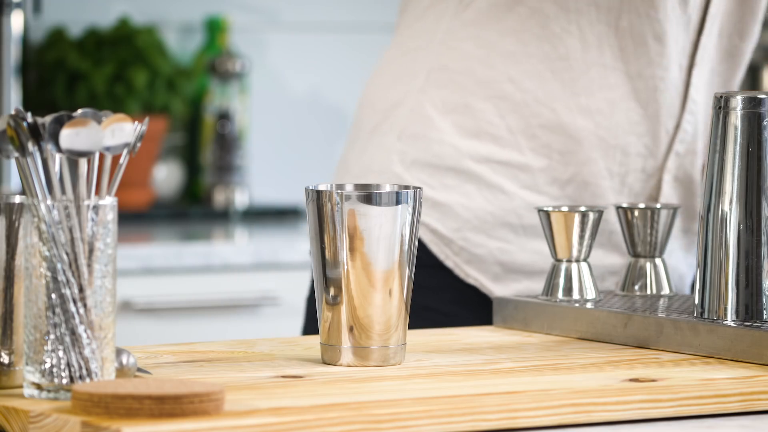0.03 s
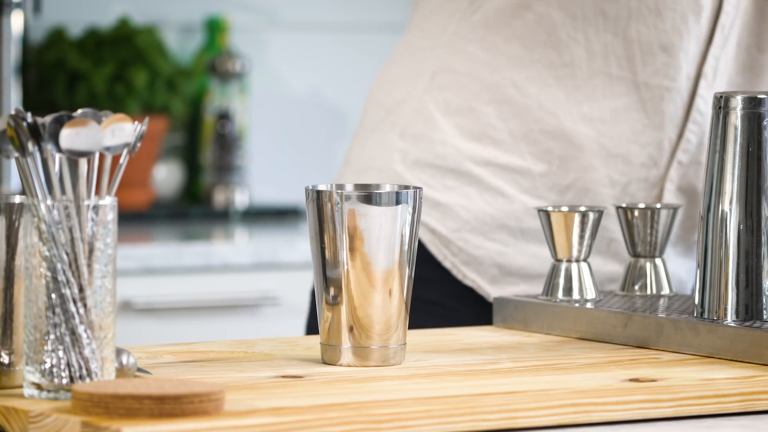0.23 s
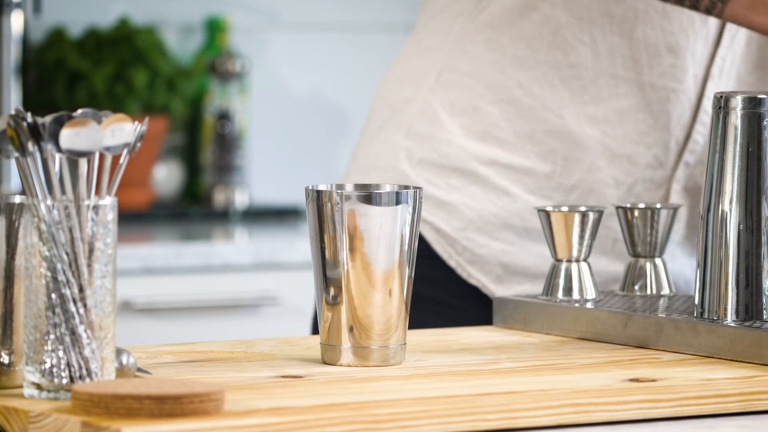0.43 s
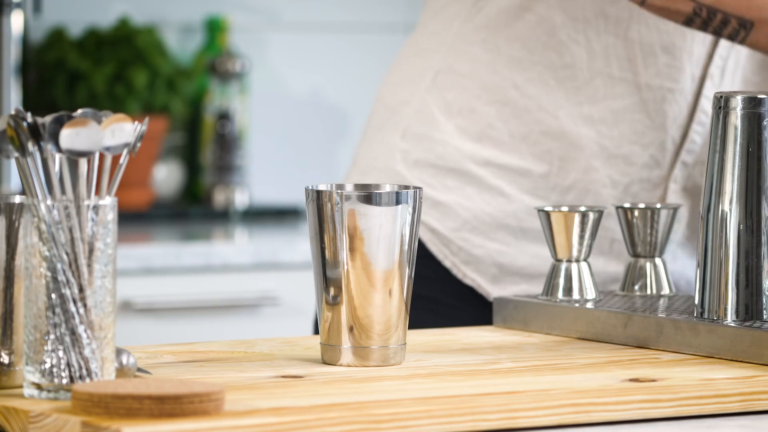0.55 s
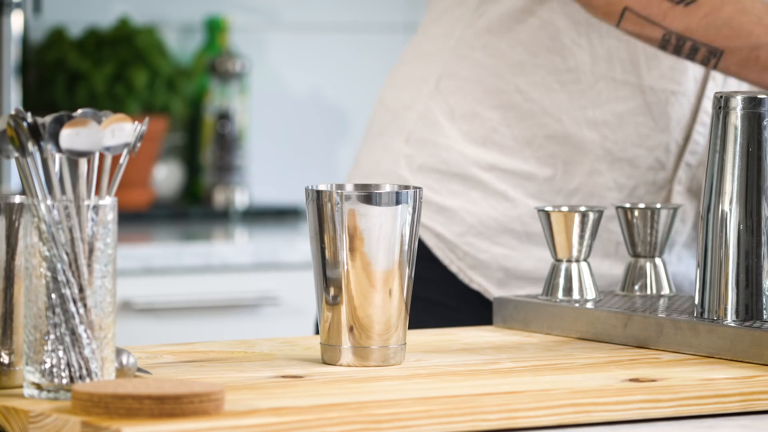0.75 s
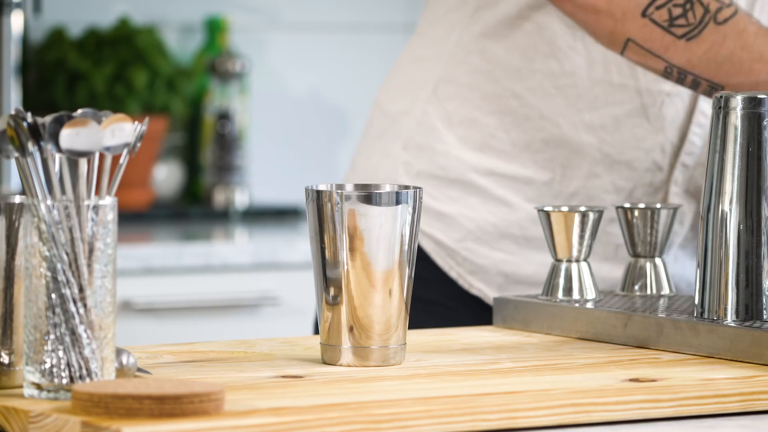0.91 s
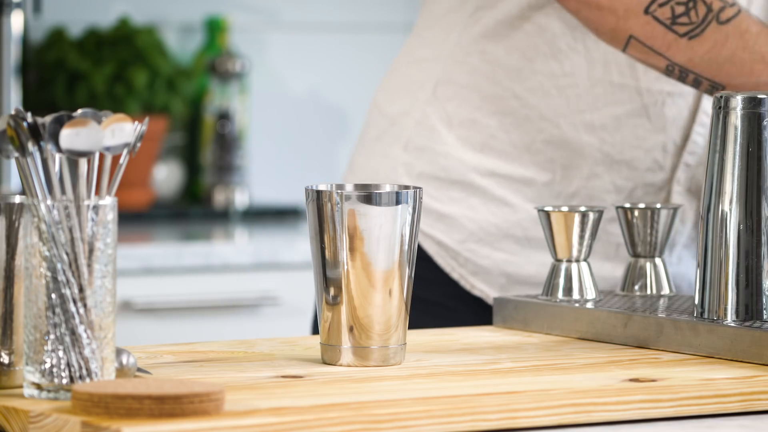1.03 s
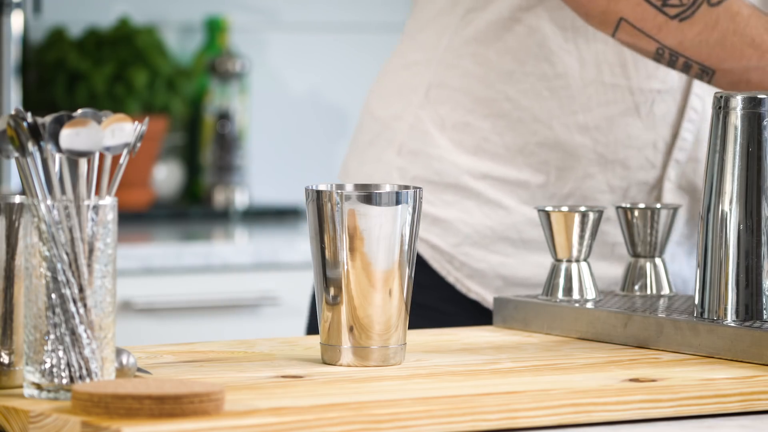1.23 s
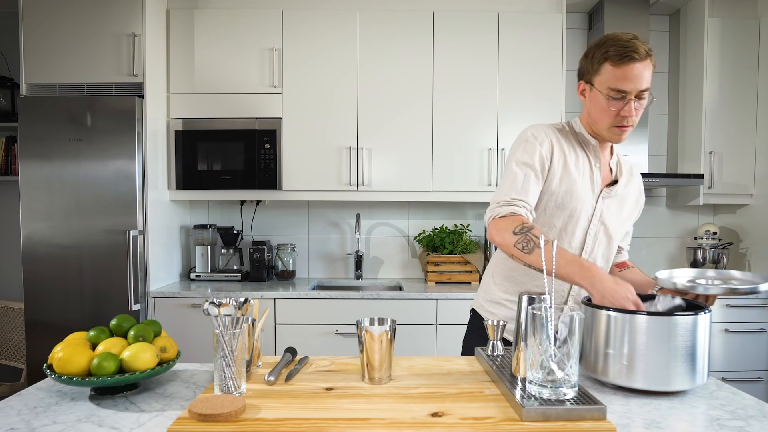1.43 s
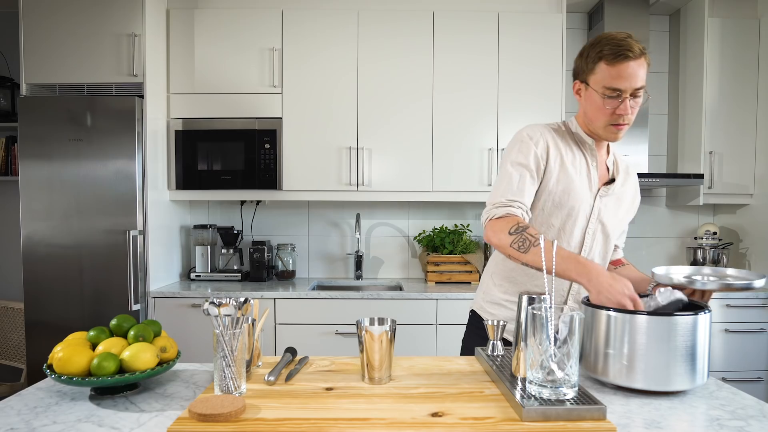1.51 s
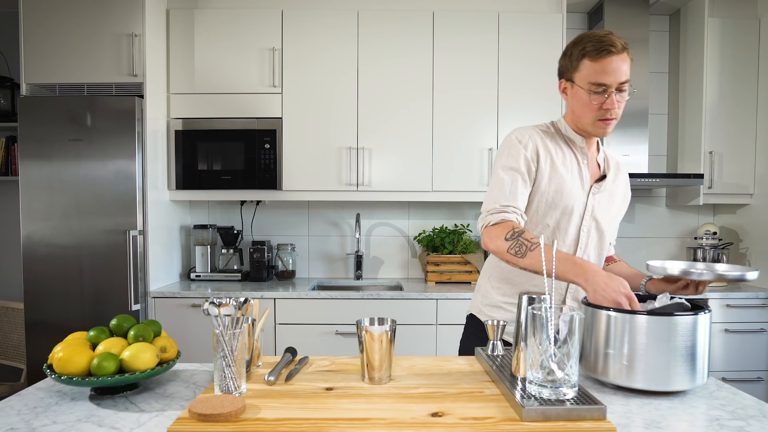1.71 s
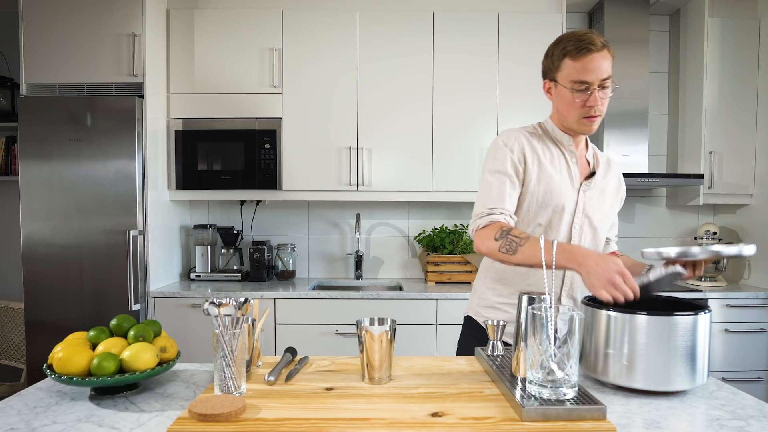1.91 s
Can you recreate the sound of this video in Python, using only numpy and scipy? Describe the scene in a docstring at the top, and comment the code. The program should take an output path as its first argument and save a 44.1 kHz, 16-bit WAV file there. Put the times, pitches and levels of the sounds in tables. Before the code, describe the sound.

Ice cubes rattle in a bucket as a metal scoop clinks once going in, then digs through them in irregular bursts. After a brief lull, cubes clatter into place in the scoop, close to the microphone in a kitchen.

```python
"""A metal scoop digs through a bucket of ice cubes in a kitchen, close to a single microphone.
Cubes knock, crack and thud on the bucket wall over a churn of small contacts. The empty scoop clinks
once on the way in; lifted out, its load settles with a last bright clatter. Each knock is a burst of
micro-contacts that sets ice, bucket or scoop ringing. Behind them are a short room tail and faint air."""
import sys
import numpy as np
from scipy import signal
from scipy.fft import rfft, irfft
from scipy.io import wavfile

SR = 44100
rng = np.random.default_rng(int(sys.argv[2]) if len(sys.argv) > 2 else 0)


def waveform_to_disk(signal):
    """Save audio, clipped to [-1, 1], as 16-bit WAV at the path in sys.argv[1]."""
    frames = np.transpose(np.atleast_2d(signal))
    scaled = np.clip(frames, -1, 1) * 32767
    samples = np.round(scaled).astype(np.int16)
    wavfile.write(sys.argv[1], SR, samples)


N = 85995
RING_T = np.arange(SR // 3) / SR  # time axis of one blow, in seconds


def undb(db):
    """Decibels to gain."""
    return 10 ** (np.asarray(db) / 20)


def unit(x):
    """Scale to unit energy."""
    return x / np.sqrt(np.sum(x ** 2) + 1e-18)


def fade(t, t60):
    """Exponential decay, 60 dB down after t60 seconds."""
    return np.exp(-np.log(1000) * t / t60)


def through(x, response):
    """Pass a sound through an impulse response."""
    return signal.fftconvolve(x, response)[:len(x)]


def add(out, start_s, blow, level_db, window_s=0.01):
    """Mix in a blow with the energy of level_db held for window_s."""
    i = max(int(start_s * SR), 0)
    out[i:i + len(blow)] += (unit(blow) * undb(level_db) * np.sqrt(window_s * SR))[:N - i]


def click(colour, size=2048):
    """A sharp click with the given spectrum."""
    hz, db = np.array(colour).T
    bins_hz = np.maximum(np.fft.rfftfreq(size, 1 / SR), 1)
    gain = undb(np.interp(np.log(bins_hz), np.log(hz), db))
    cepstrum = irfft(np.log(gain))
    cepstrum[1:size // 2] *= 2  # minimum phase: the energy comes at the front
    cepstrum[size // 2 + 1:] = 0
    pulse = irfft(np.exp(rfft(cepstrum)))
    return unit(np.pad(pulse, (0, len(RING_T) - size)))


def ring(modes):
    """Decaying modes; neighbours swing in opposite directions."""
    return unit(sum((-1) ** k * undb(db) * np.cos(2 * np.pi * hz * RING_T) * fade(RING_T, t60)
                    for k, (hz, db, t60) in enumerate(modes)))


def soft(x, edge_hz):
    """A soft contact leaves out the treble."""
    return unit(signal.sosfilt(signal.butter(2, edge_hz, fs=SR, output="sos"), x))


def struck(colour, modes, ring_db, edge_hz, lag_s=0.0008):
    """A contact click and, just after it, the modes that it sets ringing."""
    lag = int(lag_s * SR)
    ringing = soft(ring(modes), edge_hz)
    return click(colour) + undb(ring_db) * np.pad(ringing, (lag, 0))[:-lag]


def chatter(contact_s, spread_db=4.5):
    """The force of one contact: a first touch, then rough micro-contacts that die away."""
    n = len(RING_T)
    rough = rng.standard_normal(n) * undb(spread_db * np.minimum(rng.exponential(size=n), 5))
    force = unit(rough * np.exp(-(RING_T / contact_s) ** 2))
    force[0] += 0.44  # the first touch
    return force


# Click spectra of bucket wall, bucket hollow, heap of cubes and cracking ice: frequency_hz, level_db
WALL_CLICK = [(40, -59), (100, -29), (180, -8.5), (280, -2.5), (430, 6.5), (520, 3), (700, -9),
              (1200, -27.5), (4000, -71.5)]
HOLLOW_CLICK = [(200, -22.5), (500, -5.5), (750, -8), (1300, 1.5), (1800, -9), (5000, -17)]
HEAP_CLICK = [(200, -74.5), (1000, -18.5), (1600, 6.5), (2300, 5), (3000, -1.5), (3600, -2), (4700, -3),
              (6000, -18), (14000, -64)]
CRACK_CLICK = [(1000, -36), (3400, -9.5), (5200, 3.5), (6800, 2.5), (8000, -4), (11000, -8), (15000, -11.5),
               (16500, -33)]
# Modes of the wall, the hollow and the heap: pitch_hz, level_db, t60_s
WALL_MODES = [(227, -12.5, 0.1), (319.3, -9.5, 0.098), (450, -7, 0.021), (486.5, 7, 0.034),
              (530, -4.5, 0.016)]
HOLLOW_MODES = [(599, -4.5, 0.058), (850, -23, 0.082), (840, 0.5, 0.029), (954, 1.5, 0.09),
                (1105, -6.5, 0.15), (1278, -4, 0.017)]
HEAP_MODES = [(1513, -4.5, 0.075), (1720, 3.5, 0.038), (2080, -5, 0.015), (2197, 8.5, 0.11),
              (2565, 13, 0.0083), (3025, -12.5, 0.06), (3490, -5, 0.02), (3811, 0.5, 0.061),
              (4306, 0.5, 0.022), (4698, -4.5, 0.043)]


def ice_bucket():
    """The four voices a contact excites: bucket wall, its hollow, heap of cubes, cracking surface."""
    wall = struck(WALL_CLICK, WALL_MODES, ring_db=-0.08, edge_hz=500)
    hollow = struck(HOLLOW_CLICK, HOLLOW_MODES, ring_db=-5.5, edge_hz=1600)
    heap = struck(HEAP_CLICK, HEAP_MODES, ring_db=-6.25, edge_hz=5500)
    return [wall, hollow, heap, click(CRACK_CLICK)]


# Single knocks in the bucket: start_s, contact_s, pitch_hz, wall_db, hollow_db, heap_db, crack_db
CUBE_KNOCKS = [(0.001, 0.01, 2250, -45, -36, -40.5, -40), (0.055, 0.0015, 3600, -71, -56, -39, -47),
               (0.0638, 0.0024, 1440, -42.5, -40, -41, -38.5),
               (0.0972, 0.0041, 1510, -39.5, -32.5, -46, -73), (0.1254, 0.004, 1740, -31, -59, -32, -43.5),
               (0.172, 0.0085, 2190, -30, -36, -36, -59), (0.228, 0.009, 3980, -42, -32.5, -23, -33.5),
               (0.3025, 0.0053, 2270, -17.5, -27, -20, -31), (0.313, 0.0027, 2310, -43, -56, -15, -30),
               (0.319, 0.0035, 1750, -30, -27.5, -23, -35), (0.332, 0.0013, 1910, -25, -30, -23.5, -31.5),
               (0.346, 0.0033, 2250, -26.5, -40, -36, -53), (0.471, 0.007, 2130, -34, -33, -27, -41),
               (0.482, 0.0032, 2730, -39, -27, -22, -27.5), (0.49, 0.0081, 2260, -32, -30, -23, -23.5),
               (0.502, 0.0058, 1570, -15, -23, -17, -35), (0.534, 0.0036, 2300, -30, -26, -25, -39),
               (0.5468, 0.0044, 4000, -46, -22, -18.5, -26.5), (0.551, 0.0016, 2250, -16, -27, -49, -25.5),
               (0.57, 0.0033, 2550, -20, -42, -29.5, -40), (0.614, 0.0096, 2160, -23, -44, -21, -28),
               (0.6233, 0.0029, 2300, -30, -38, -20.5, -28), (0.632, 0.0073, 2590, -27, -40, -17, -42),
               (0.659, 0.0072, 2120, -26, -22.5, -23, -53), (0.702, 0.0043, 1900, -29, -37, -24.5, -40),
               (0.743, 0.0019, 2220, -50, -34, -24.5, -48), (0.788, 0.0058, 2200, -35, -27.5, -27, -33),
               (0.803, 0.0054, 1780, -37, -42, -20.5, -39.5), (0.853, 0.0036, 1780, -26.5, -54, -24.5, -32),
               (0.864, 0.0044, 1730, -22, -51, -18.5, -23.5), (0.877, 0.0088, 2270, -23.5, -18, -17.5, -22),
               (0.883, 0.013, 2640, -41, -49, -14, -19.5), (0.895, 0.015, 2660, -31, -44, -24, -28),
               (0.9185, 0.0078, 2400, -27.5, -20, -18, -26), (0.964, 0.011, 2260, -39, -29.5, -23.5, -54),
               (0.982, 0.0084, 2100, -55, -41, -18, -46), (1.007, 0.0037, 2430, -47, -59, -22.5, -46),
               (1.02, 0.0039, 2200, -55, -41, -21.5, -32.5), (1.048, 0.01, 2360, -26, -15.5, -17.5, -28),
               (1.0518, 0.0086, 1830, -20.5, -20.5, -15.5, -32),
               (1.089, 0.0014, 2320, -39, -44, -23.5, -40), (1.093, 0.0041, 2270, -54, -41, -19.5, -37),
               (1.16, 0.0033, 2600, -42, -43, -26, -30.5), (1.189, 0.009, 2120, -60, -23.5, -19.5, -37),
               (1.243, 0.011, 2710, -27, -19.5, -14.5, -37), (1.26, 0.0033, 2170, -33.5, -28, -18.5, -37),
               (1.283, 0.0048, 2190, -27, -24, -15.5, -24), (1.3415, 0.006, 2200, -64, -52, -19.5, -31.5),
               (1.3448, 0.0031, 2180, -38, -44, -19, -27), (1.395, 0.0051, 2240, -38.5, -33, -16.5, -20.5),
               (1.397, 0.0059, 2260, -38, -24, -12, -19.5), (1.413, 0.0049, 2450, -41, -30.5, -33, -54),
               (1.432, 0.0027, 2320, -48, -34, -15.5, -29.5),
               (1.488, 0.00076, 1940, -48.5, -61, -18.5, -42),
               (1.538, 0.0087, 1540, -38.5, -31.5, -34.5, -57.5)]


def cube_knocks(voices, note_t60_s=0.008, note_db=-3):
    """Close up, single cubes strike each other and the wall, each with its own short note."""
    out = np.zeros(N)
    wall, hollow, heap, crack = voices
    for start_s, contact_s, pitch_hz, wall_db, hollow_db, heap_db, crack_db in CUBE_KNOCKS:
        force = chatter(contact_s)
        note = soft(ring([(pitch_hz, 0, note_t60_s)]), edge_hz=4500)
        thud = wall + 0.51 * through(force, wall)  # the heavy wall takes a contact mostly as one push
        knock = unit(through(force, heap)) + undb(note_db) * unit(through(force, note))
        add(out, start_s + contact_s / 2, thud, wall_db)
        add(out, start_s, through(force, hollow), hollow_db)
        add(out, start_s, knock, heap_db)
        add(out, start_s, through(force, crack), crack_db)
    return out


# Spectrum of the bucket rumbling on the counter: frequency_hz, level_db
RUMBLE_CLICK = [(35, -33.5), (65, -19), (95, -6), (140, -5), (200, -9.5), (500, -39.5)]
# Course of the churn, before the trims: time_s, rumble_db, wall_db, hollow_db, heap_db, crack_db
CHURN_LEVELS = [(0, -52, -48, -43, -42, -46), (0.04, -51, -51, -50, -46, -49),
                (0.08, -44, -43, -46, -44, -50), (0.115, -51, -46, -45, -40, -54),
                (0.19, -50, -37, -42, -37, -45), (0.29, -62, -52, -52, -52, -58),
                (0.32, -44, -35, -40, -35, -43), (0.42, -54, -37, -42, -34, -44),
                (0.49, -47, -31, -32, -22, -29), (0.58, -42, -27, -35, -27, -35),
                (0.635, -47, -27, -31, -21, -31), (0.71, -49, -32, -36, -28, -39),
                (0.84, -49, -36, -37, -32, -41), (0.89, -47, -28, -30, -19, -26),
                (0.95, -44, -37, -35, -27, -37), (1.08, -54, -32, -33, -28, -39),
                (1.14, -58, -40, -37, -34, -45), (1.22, -57, -40, -31, -29, -36),
                (1.32, -52, -40, -36, -29, -41), (1.41, -55, -38, -34, -24, -32),
                (1.48, -60, -51, -45, -38, -57), (1.58, -68, -62, -58, -52, -65)]
# Trim on each voice of the churn: rumble_db, wall_db, hollow_db, heap_db, crack_db
CHURN_TRIMS = (3.5, -2, 1.5, 0, 0)


def churn(voices, contacts_per_s=5000, spread_db=2.5):
    """Small contacts crowd together as the scoop pushes the heap; the bucket rumbles on the counter."""
    t = np.arange(N) / SR
    times_s, *curves_db = np.array(CHURN_LEVELS).T
    touches = rng.random(N) < contacts_per_s / SR
    strength = touches * undb(spread_db * np.minimum(rng.exponential(size=N), 4))
    release = fade(np.maximum(t - times_s[-1], 0), t60=0.14)
    out = np.zeros(N)
    for voice, curve_db, trim_db in zip([click(RUMBLE_CLICK)] + voices, curves_db, CHURN_TRIMS):
        contacts = unit(strength * rng.standard_normal(N)) * np.sqrt(N)
        envelope = release * undb(np.interp(t, times_s, curve_db) + trim_db)
        out += through(contacts * envelope, unit(voice))
    return out


# Modes of the empty metal scoop: pitch_hz, level_db, t60_s
SCOOP_MODES = [(960, -15, .12), (1632, -14, .16), (2095, -15, .1), (2242, -13, .1), (2553, -16, .25),
               (3554, -13, .15), (3947, -17, .1), (4080, -9, .15), (4797, 2, .12), (5911, -18, .11),
               (6350, -15, .12), (6792, -12, .19), (7412, -15, .13), (8231, -14, .1), (9480, -21, .09),
               (13850, -23, .07)]


def bucket_and_scoop_resonance(ice, echo_db=-10.5, scoop_db=-27):
    """The ice echoes inside the bucket, and the scoop rings faintly along with it."""
    echo = unit(rng.standard_normal(len(RING_T)) * fade(RING_T, t60=0.071))
    return through(ice, undb(echo_db) * echo + undb(scoop_db) * ring(SCOOP_MODES))


# Spectrum of a click on the scoop: frequency_hz, level_db
SCOOP_CLICK = [(150, -52.5), (400, -21.5), (600, -7), (1100, -6.5), (1700, 2.5), (2800, -4), (4700, 1),
               (5600, -11), (14000, -32)]


def scoop_clink(start_s=0.2138):
    """The empty scoop strikes the bucket once: a tick and a bright metal ring."""
    out = np.zeros(N)
    tick = through(chatter(contact_s=0.0076), click(SCOOP_CLICK))
    add(out, start_s, ring(SCOOP_MODES), level_db=-17)
    add(out, start_s, tick, level_db=-17.5)
    return out


# Modes of the scoop loaded with ice: pitch_hz, level_db, t60_s
LOADED_SCOOP_MODES = [(1205, -8.5, .04), (1520, -14.5, 0.1), (1760, -5, 0.021), (1750, 8.5, 0.015),
                      (1975, -17, .025), (2190, 8.5, 0.019), (2447, 5, 0.016), (3270, -3, 0.052),
                      (4180, 0, .03), (4430, -2, 0.067), (4730, -8, 0.033)]
# Cubes landing in the scoop: start_s, contact_s, knock_db, crack_db
SETTLING_KNOCKS = [(1.6357, 0.0009, -25.5, -57), (1.6444, 0.0037, -29, -31.5),
                   (1.651, 0.0045, -17.5, -26.5), (1.657, 0.0043, -23, -24), (1.664, 0.006, -26.5, -26),
                   (1.6672, 0.0043, -15, -20.5), (1.675, 0.0078, -19, -33), (1.68, 0.006, -40, -28),
                   (1.69, 0.0034, -22.5, -36), (1.899, 0.002, -46.5, -65), (1.922, 0.0027, -58, -79)]


def settling_cubes():
    """Cubes tumble into place in the lifted scoop, still close to the microphone."""
    out = np.zeros(N)
    scoop = struck(SCOOP_CLICK, LOADED_SCOOP_MODES, ring_db=-4.5, edge_hz=5200)
    crack = click(CRACK_CLICK)
    for start_s, contact_s, knock_db, crack_db in SETTLING_KNOCKS:
        force = chatter(contact_s)
        add(out, start_s, through(force, scoop), knock_db)
        add(out, start_s, through(force, crack), crack_db)
    return out


# Reverberation of the kitchen by band: centre_hz, level_db, t60_s
KITCHEN_BANDS = [(127, -12.5, 0.94), (404, -13.5, 0.27), (930, -7, 0.69), (1980, -16, 0.66),
                 (4100, -13, 0.68), (7900, -14, 0.52), (15100, -13.5, 0.19)]


def kitchen_reverb(near, build_up_s=0.0054):
    """The kitchen returns the close sounds as a diffuse tail, each band dying at its own rate."""
    t = np.arange(SR) / SR
    bands = np.array(KITCHEN_BANDS)
    noise_spectrum = rfft(rng.standard_normal(SR))
    log_hz = np.log(np.arange(SR // 2 + 1) + 1)
    tail = np.zeros(SR)
    for share, (_, level_db, t60_s) in zip(np.eye(len(bands)), bands):
        band = irfft(noise_spectrum * np.interp(log_hz, np.log(bands[:, 0]), share))
        envelope = unit(fade(t, t60_s) * (1 - np.exp(-t / build_up_s)))
        tail += undb(level_db) * band * envelope
    return through(near, tail)


# Spectrum of the kitchen's room tone: frequency_hz, density_db
AIR_SPECTRUM = [(25, 11), (50, -2.5), (110, -2.5), (300, -1), (1000, -7), (4000, -19), (15000, -25)]


def room_tone(level_db=-51.5):
    """Faint, steady air all round the microphone, strongest in the bass."""
    return undb(level_db) * through(rng.standard_normal(N), click(AIR_SPECTRUM))


def scene():
    """One microphone position: bucket and scoop up close, the kitchen around them."""
    voices = ice_bucket()
    ice = cube_knocks(voices) + churn(voices)
    near = ice + bucket_and_scoop_resonance(ice) + scoop_clink() + settling_cubes()
    air = room_tone()
    return (near + kitchen_reverb(near) + air)[None]


def record(dry, low_cut_hz=55, ceiling=0.68, top_hz=15800):
    """The recorder cuts the deep bass, rounds the highest peaks and cuts the top."""
    low_cut = signal.butter(2, low_cut_hz, "high", fs=SR, output="sos")
    top_cut = signal.ellip(8, 0.1, 50, top_hz, fs=SR, output="sos")
    x = signal.sosfilt(low_cut, dry)
    rounded = x / (1 + (x / ceiling) ** 6) ** (1 / 6)
    return signal.sosfiltfilt(top_cut, rounded)


dry = scene()
out = record(dry)
waveform_to_disk(out)
```